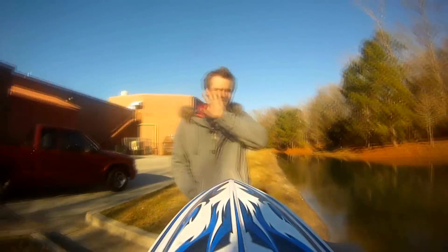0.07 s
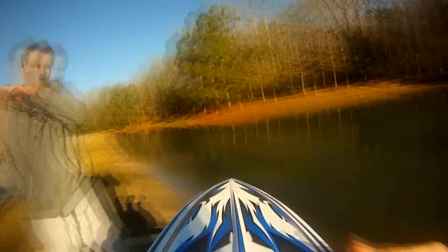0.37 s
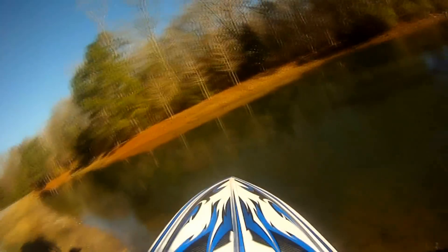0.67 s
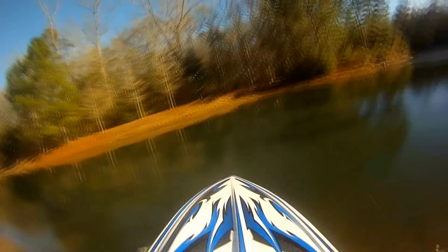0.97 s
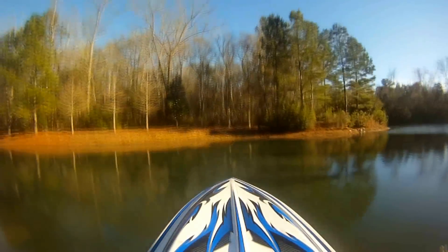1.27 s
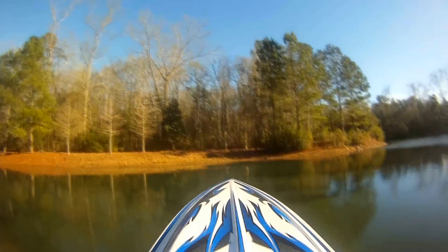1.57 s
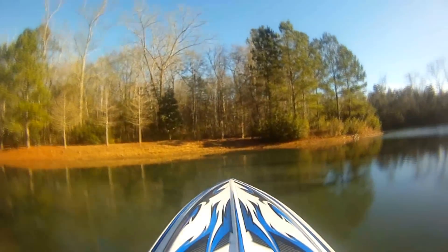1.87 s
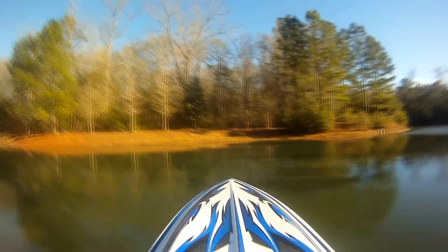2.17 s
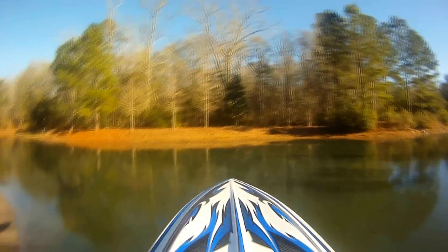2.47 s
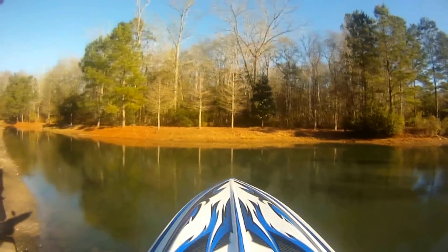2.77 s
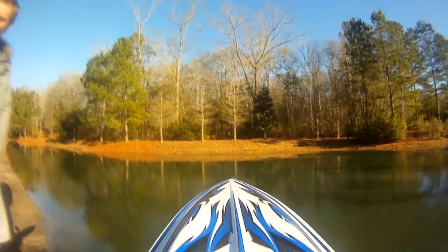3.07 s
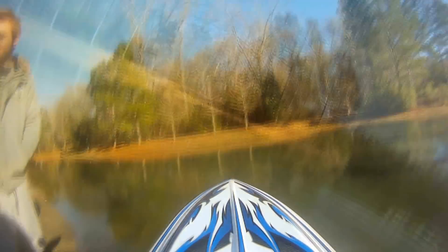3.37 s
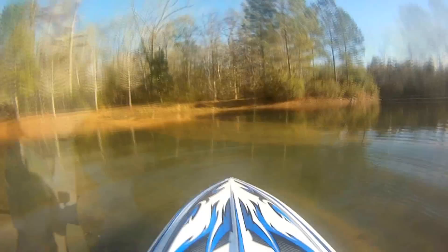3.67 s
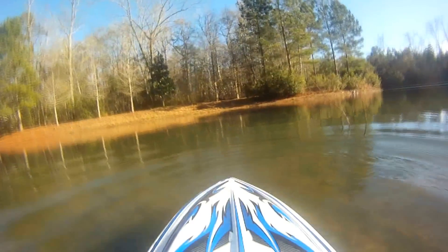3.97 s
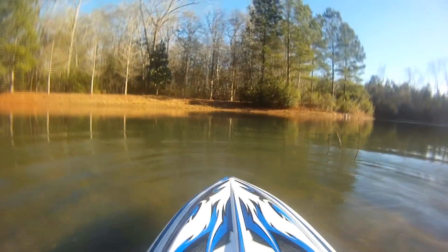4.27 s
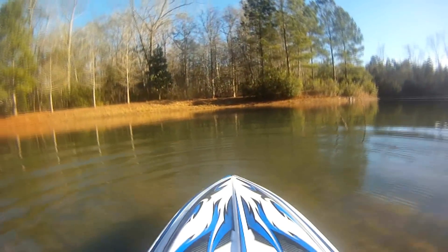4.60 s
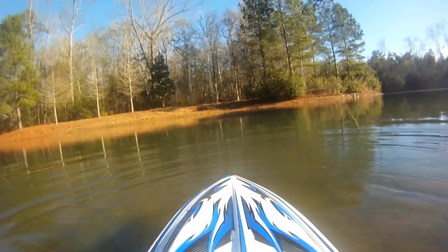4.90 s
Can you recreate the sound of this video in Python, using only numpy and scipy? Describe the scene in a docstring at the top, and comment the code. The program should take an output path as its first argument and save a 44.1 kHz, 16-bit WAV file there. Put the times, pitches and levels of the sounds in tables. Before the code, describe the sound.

A small electric model boat is swung at a lake's edge, making a low rumble while hands rub and knock on the hull. Short blips of throttle then kick the motor up with clanks, and the propeller shaft rattles and hums as it coasts down. Once it stops, only rubbing, knocks and faint squeaks remain. Everything sounds close and boxy, heard through a camera housing on the deck.

```python
"""A small electric model boat at a lake's edge, heard from a camera in a hard housing on its deck.
First comes a low rumble as the boat is swung, and hands rub, knock and squeak on the hull.
From about 1.4 s, short blips of throttle kick the motor up with a clank; the propeller shaft coasts
down, rattling in its tube, and stops. After about 3.9 s only the handling and faint open air are left.
Nearly everything arrives through hull and housing."""
import sys
import numpy as np
from scipy import signal
from scipy.fft import rfft, irfft, next_fast_len
from scipy.io import wavfile
from scipy.ndimage import uniform_filter1d, map_coordinates

SR = 44100
rng = np.random.default_rng(int(sys.argv[2]) if len(sys.argv) > 2 else 0)


def inscribe(sig):
    """Save sig as 16-bit PCM at rate SR to the path in sys.argv[1].

    A 1-D sig is mono; a 2-D sig holds one channel per row.
    Samples are clipped to [-1, 1] before scaling.
    """
    pcm = np.round(np.clip(np.atleast_2d(sig).T, -1, 1) * 32767)
    wavfile.write(sys.argv[1], SR, pcm.astype(np.int16))


N = 226759
TIME = np.arange(N) / SR


def amp(db):
    """Turn decibels into a number to multiply by."""
    return 10 ** (np.asarray(db) / 20)


def unit(x):
    """Scale x to an average strength (rms) of 1."""
    return x / np.sqrt(np.mean(x ** 2) + 1e-20)


def along(points, hz):
    """Read between (Hz, value) points, spaced by pitch."""
    f, v = np.transpose(points)
    return np.interp(np.log(hz + 1), np.log(f + 1), v)


def wobble(rate):
    """A smooth curve through `rate` random values a second."""
    return map_coordinates(rng.standard_normal(int(N * rate / SR) + 4), [TIME * rate])


def filtered(x, gain):
    """Turn each frequency in x up or down by gain(hz)."""
    size = next_fast_len(len(x) + 8192)
    return irfft(rfft(x, size) * gain(np.fft.rfftfreq(size, 1 / SR)), size)[:len(x)]


def coloured(x, points):
    """Shape the bass and treble of x with (Hz, dB) points."""
    return filtered(x, lambda hz: amp(along(points, hz)))


def split(x, hz):
    """The parts of x below and above a frequency."""
    return [signal.sosfilt(signal.butter(4, hz, kind, fs=SR, output="sos"), x)
            for kind in ("low", "high")]


# Soft low thumps, from handling and from the slowly turning shaft: t/s, level/dB
THUMPS = [(0.37, -57), (0.645, -49), (0.98, -51.5), (1.2, -53), (1.32, -55), (1.45, -46.5), (1.64, -53),
          (2.11, -49), (2.44, -56), (2.96, -48), (3.219, -62), (3.339, -50.5), (3.67, -54), (4.15, -53),
          (4.485, -47), (4.84, -51.5), (5.11, -56)]
# Tone colour of the rumble: f/Hz, level/dB
RUMBLE_COLOUR = [(10, -5), (28, 0), (60, 4.5), (110, -1.5), (220, -24), (500, -23), (2000, -64.5)]

def rumble(sway_db=-63, thump_trim_db=0.5, build_s=0.42, thump_width_s=0.042):
    """The moving boat makes a low noise that builds up and swells unevenly, with soft thumps on top."""
    level_db = sway_db + 3.5 * wobble(7) + np.interp(TIME, [0, build_s], [-10, 0])
    for s, db in THUMPS:
        level_db = np.maximum(level_db, db + thump_trim_db - 10 * ((TIME - s) / thump_width_s) ** 2)
    return amp(level_db) * unit(coloured(rng.standard_normal(N), RUMBLE_COLOUR))


# Tone colour of the air: f/Hz, level/dB
AIR_COLOUR = [(100, -6), (250, -14.5), (450, -20.5), (1500, -31), (2900, -35), (3700, -42.5), (4600, -40.5),
              (6000, -50.5), (8400, -44.5), (14000, -45.5), (15300, -56)]

def lakeside_air(level_db=-68):
    """The still lakeside is a faint, steady hush through the housing."""
    return amp(level_db) * unit(coloured(rng.standard_normal(N), AIR_COLOUR))


# What hull and housing let through: f/Hz, level/dB
WALL_COLOUR = [(40, -23), (120, -16), (380, -15.5), (850, -13.5), (1750, -12), (2450, -12.5), (3000, -26),
               (4300, -38), (6100, -54.5), (7700, -44), (10000, -29), (11900, -37.5), (14000, -26),
               (15200, -38)]
# The notes they ring at: f/Hz, width/Hz, boost/dB
WALL_NOTES = [(210.5, 127, 8.5), (557.4, 145, 11.5), (711, 72, 5), (1068, 285, 8.5), (1262, 160, 11),
              (1405, 181, 7), (1592, 50, 5.5), (2080, 470, 7), (2660, 66, 4.5), (3651, 727, 18.5),
              (4937, 490, 10.5), (7080, 580, 8.5), (8305, 450, 14.5), (9760, 310, 8), (10755, 205, 14.5),
              (13280, 260, 6.5)]

def housing(x, size=4096):
    """Hull and housing muffle the sound passing through and ring at their own notes."""
    hz = np.fft.rfftfreq(size, 1 / SR)
    boost_db = sum(boost / (1 + (2 * (hz - note) / width) ** 2) for note, width, boost in WALL_NOTES)
    cepstrum = irfft(np.log(amp(along(WALL_COLOUR, hz) + boost_db)))
    # Folding onto the first half makes the ring follow a tap, never come before it.
    cepstrum[1:size // 2] *= 2
    cepstrum[size // 2 + 1:] = 0
    ring = irfft(np.exp(rfft(cepstrum)))
    return signal.fftconvolve(x, ring / np.linalg.norm(ring))[:len(x)]


def contacts(rate, spread_db, ring_s, click):
    """Random tiny hits, `rate` a second; each is a click and a brief scatter of echoes in the hull."""
    hits = rng.random(N) < rate / SR
    sizes = hits * amp(spread_db * np.clip(rng.standard_normal(N), -2, 2))
    dying = amp(-60 * TIME[:SR // 10] / ring_s) ** 2
    echo_energy = np.abs(signal.fftconvolve(sizes ** 2, dying / dying.sum())[:N])
    return click * sizes * rng.choice([-1, 1], N) + np.sqrt(echo_energy) * rng.standard_normal(N)


def patchy(x, depth_db, size=256):
    """Shift the tone colour from moment to moment with random louder and softer patches."""
    spectra = signal.stft(x, nperseg=size)[2]
    patches = uniform_filter1d(rng.standard_normal(spectra.shape), size=2, axis=0)
    patches = uniform_filter1d(patches, size=12, axis=1)
    return signal.istft(spectra * amp(depth_db * unit(patches)), nperseg=size)[1][:N]


# Rubs and swishes as the boat is swung and lowered: t/s, length/s, level/dB
STROKES = [(0.207, 0.35, -72.5), (0.598, 0.028, -64), (0.673, 0.24, -72.5), (1.173, 0.27, -74),
           (1.359, 0.076, -62.5), (2.164, .04, -66), (2.24, 0.047, -75), (3.013, 0.27, -75.5),
           (3.259, 0.03, -56.5), (3.329, .018, -48), (3.847, 0.012, -52.5), (3.938, 1.23, -63),
           (4.133, 0.037, -53), (4.22, 0.021, -53), (4.375, 0.096, -59), (4.509, .175, -54.5),
           (4.701, 0.17, -50), (4.832, .005, -45), (4.899, 0.11, -54.5), (5.051, 0.0091, -60.5),
           (5.109, 0.012, -54.5)]
# Tone colour of rubbing, which stirs the hull's own notes: f/Hz, level/dB
RUB_COLOUR = [(60, 0.5), (250, 5), (600, -0.5), (850, -2), (1200, -5.5), (1700, -11), (2150, -5),
              (2900, -4.5), (3700, 0.5), (4700, 3.5), (8400, 4.5), (15000, -4.5)]

def rubbing(grip_db=-84, trim_db=0.47, rise_db_per_s=2500, fall_db_per_s=330):
    """Hands slide on the hull in many tiny jerks, whose colour shifts as the touch moves."""
    level_db = np.full(N, grip_db)  # the hands never hold quite still
    for s, length, db in STROKES:
        shape_db = np.minimum(rise_db_per_s * (TIME - s), fall_db_per_s * (s + length - TIME))
        level_db = np.maximum(level_db, db + trim_db + np.minimum(shape_db, 0))
    slips = contacts(1100, spread_db=2.5, ring_s=0.029, click=0.53)
    rub = patchy(housing(slips), depth_db=3)
    return amp(level_db + wobble(25)) * unit(coloured(rub, RUB_COLOUR))


def blow(s, db, bass_db, ring_s, tone_hz, treble_db, trim_db=-1, bass_trim_db=-2):
    """One hit: a click, a short shudder and a hollow tone. Bass and treble are set against the middle."""
    out, t = np.zeros(N + SR), TIME[:SR // 5]
    rise = 1 - np.exp(-t / 0.00059)
    shudder = rng.standard_normal(len(t)) * amp(-60 * t / ring_s) * rise
    shudder[0] += 3  # the click
    low, treble = split(housing(shudder), 6000)
    bass, middle = split(low, 700)
    hollow = 3 * signal.lfilter(*signal.iirpeak(tone_hz, Q=5, fs=SR), low)
    for band, band_db in ((bass, bass_db + bass_trim_db), (middle + hollow, 0), (treble, treble_db)):
        out[round(s * SR):][:len(t)] += amp(db + band_db + trim_db) * band / np.abs(band).max()
    return out[:N]


# Knocks on the hull from hands, and two jolts (1.431 s, 2.425 s) as the motor starts:
# t/s, level/dB, bass/dB, time to fade by 60 dB/s, hollow tone f/Hz
KNOCKS = [(0.272, -51, 0, 0.13, 270), (0.295, -38.5, -11, 0.061, 2480), (0.336, -47.5, 3.5, 0.036, 288),
          (0.476, -45, -6, 0.023, 2180), (0.637, -35.5, -4.5, 0.021, 3500), (0.802, -44, -5, 0.017, 1900),
          (0.951, -37, 3, 0.07, 2150), (1.046, -52.5, -14, 0.034, 2220), (1.155, -55, 10.5, .035, 570),
          (1.304, -42.5, -1.5, 0.024, 1510), (1.367, -52, -18, 0.027, 1980), (1.379, -46, -1, 0.022, 650),
          (1.431, -32.5, 0.5, 0.27, 2200), (2.345, -47, 0, .022, 1260), (2.425, -33.5, 2.5, 0.13, 2200),
          (3.028, -46, 0, 0.069, 1220), (3.101, -49, -5, 0.033, 1360), (3.938, -48.5, 2.5, 0.091, 565),
          (4.471, -32.5, 1, .04, 2110), (4.5, -37, -20, .021, 1160), (4.521, -44, -18, 0.027, 1300),
          (4.767, -38, -7, 0.054, 1210), (4.834, -37, -13, 0.024, 3700), (4.884, -37.5, -3, 0.068, 535),
          (5.115, -31.5, -2.5, 0.025, 580), (5.124, -30.5, -3, 0.018, 2300)]

def knocks():
    """Hands, and twice the starting motor, jolt the hull; each spot has its own hollow tone."""
    return sum(blow(*knock, treble_db=-9.5) for knock in KNOCKS)


# Squeaks and faint whines: t/s, length/s, first f/Hz, last f/Hz, level/dB,
# overtone slope/(dB per octave), waver as a share of the pitch
SQUEAKS = [(0.813, 0.085, 424, 336, -74.5, -27, .02), (3.061, 0.02, 1750, 1970, -66.5, -19, 0.06),
           (3.87, 0.2, 559, 501, -66.5, -24, 0.05), (4.325, 0.037, 1716, 1710, -65.5, -6, 0.03),
           (4.4, 0.027, 1540, 1740, -67, -11, 0.1), (4.435, 0.038, 2730, 3170, -62, -19, .14)]

def squeaks():
    """Slips that fall into step give a short gliding tone, raspy when their pace is uneven."""
    out = np.zeros(N)
    for s, length, first_hz, last_hz, db, slope_db, waver in SQUEAKS:
        on = (TIME >= s) & (TIME < s + length)
        progress = (TIME[on] - s) / length
        hz = (first_hz + (last_hz - first_hz) * progress) * (1 + waver * wobble(first_hz)[on])
        phase = 2 * np.pi * np.cumsum(hz) / SR
        tone = sum(amp(slope_db * np.log2(k)) * np.sin(k * phase) for k in range(1, 8))
        swell = np.sqrt(np.abs(np.sin(np.pi * progress)))
        out[on] += amp(db) * unit(tone * swell)
    return out


# Throttle blips: on t/s, off t/s, top shaft speed f/Hz, level/dB, fade while coasting/(dB per s)
BLIPS = [(1.449, 1.483, 130, -32, 32), (1.664, 1.71, 202, -33, 13.5), (2.439, 2.467, 156.6, -32, 11),
         (2.522, 2.55, 196.5, -32, 20), (3.3435, 3.388, 144.3, -32.5, 34),
         (3.432, 3.46, 157.5, -34.5, 23.5)]

def shaft_motion(friction_hz_per_s=295, drag_per_s=1.3, kick_db_per_hz=0.0234, smooth_s=0.013):
    """Turns a second and loudness: each blip spins the shaft up, then friction and drag slow it."""
    speed, level_db = np.zeros(N), np.full(N, BLIPS[0][3])
    friction_hz = friction_hz_per_s / drag_per_s
    for on, off, top_hz, db, fade in BLIPS:
        from_hz = speed[int(on * SR)]
        spin_up = np.interp(TIME, [on, off], [from_hz, top_hz])
        coast = (top_hz + friction_hz) * np.exp(-drag_per_s * (TIME - off)) - friction_hz
        kick_db = kick_db_per_hz * (top_hz - from_hz)  # louder with more speed to gain
        stages = [TIME < on, TIME < off]
        speed = np.select(stages, [speed, spin_up], np.maximum(coast, 0))
        level_db = np.select(stages, [level_db, db + kick_db], db - fade * (TIME - off))
    return speed, uniform_filter1d(level_db, int(smooth_s * SR))


def shaft_rattle(speed, angle, treble_db=-13.5):
    """The loose shaft clatters in its tube, most at one side of each turn."""
    hits_per_s = 850 + 10 * speed
    clatter = contacts(hits_per_s, spread_db=3, ring_s=0.024, click=0.59) * (1 + 0.077 * np.cos(angle))
    body, treble = split(housing(clatter / np.sqrt(hits_per_s)), 6000)
    rattle = unit(body) + amp(treble_db) * unit(treble)
    # Hard hits carry little bass.
    return coloured(rattle, [(60, -5.5), (250, 1.7), (420, 2.0), (650, 3.9), (1400, 1.3), (2500, 2.0)])


# Tones in the hum: multiple of the shaft speed, level/dB
HUM_TONES = [(1, -8.5), (2, -3), (3, -9), (4, -7), (5, -9), (6, -18.5), (7, -6.5), (8, -13), (9, -14.5),
             (10, -5.5)]

def shaft_hum(speed, angle, muffle_hz=800, fade_below_hz=45):
    """The unbalanced shaft and its two-bladed propeller hum at a pitch that follows their speed."""
    hum = sum(amp(db + 2.1 * wobble(14)) * np.sin(k * angle) / np.hypot(1, k * speed / muffle_hz)
              for k, db in HUM_TONES)
    return housing(hum * np.minimum(speed / fade_below_hz, 1))


def drive(hum_db=-10.5, settle_hz=20.4):
    """The spinning shaft rattles and hums; both die away below settle_hz turns a second."""
    speed, level_db = shaft_motion()
    angle = 2 * np.pi * np.cumsum(speed) / SR
    sound = shaft_rattle(speed, angle) + amp(hum_db) * shaft_hum(speed, angle)
    turning = (speed / settle_hz) ** 2.7
    return turning / np.hypot(1, turning) * amp(level_db + 0.7 * wobble(45)) * sound


# Clanks of the shaft: t/s, level/dB
CLANKS = [(1.453, -27), (1.465, -29), (2.116, -26), (2.143, -30.5), (2.446, -21.5), (2.457, -24),
          (2.744, -28), (2.999, -39.5), (3.348, -33), (3.372, -24), (3.39, -20), (3.439, -35), (3.665, -25),
          (3.808, -31.5)]

def clanks():
    """The shaft hits its tube as it takes up load or comes to rest."""
    return sum(blow(s, db, bass_db=-15, ring_s=0.059, tone_hz=1350, treble_db=-13.5) for s, db in CLANKS)


def scene():
    """Add up all the sounds in one channel."""
    return (rumble() + lakeside_air() + rubbing() + knocks() + squeaks() + drive() + clanks())[None]


def record(dry, notch_hz=12000, notch_width_hz=260, top_hz=15600, edge_hz=450):
    """The camera cuts a narrow notch in the treble and keeps nothing above top_hz."""
    def gain(hz):
        notch = 1 - np.exp(-((hz - notch_hz) / notch_width_hz) ** 2)
        return notch * np.clip((top_hz - hz) / edge_hz, 0, 1) ** 2
    return filtered(dry[0], gain)[None]


dry = scene()
out = record(dry)
inscribe(out)
```